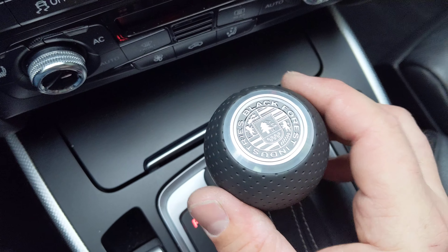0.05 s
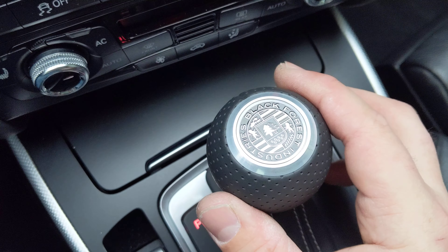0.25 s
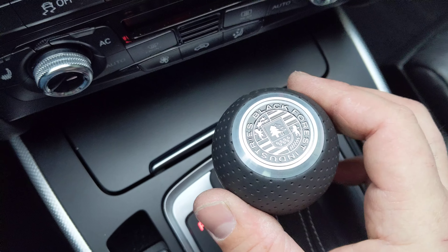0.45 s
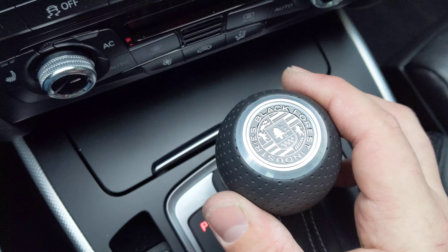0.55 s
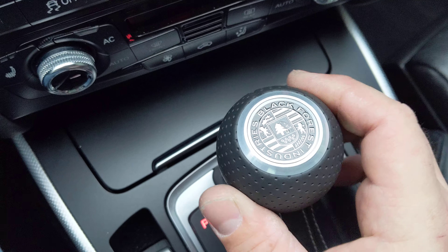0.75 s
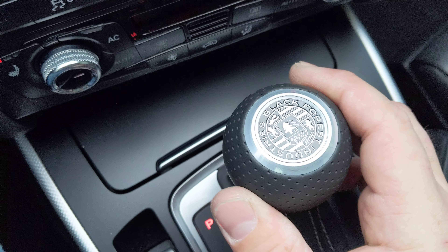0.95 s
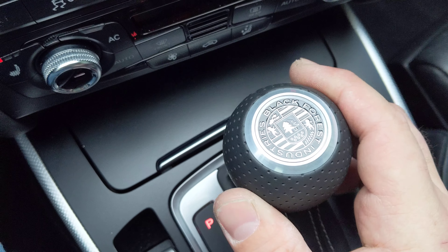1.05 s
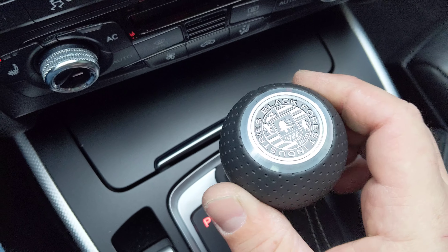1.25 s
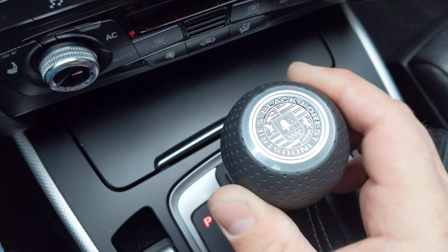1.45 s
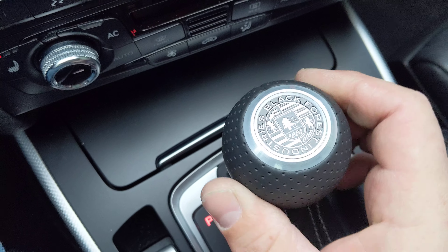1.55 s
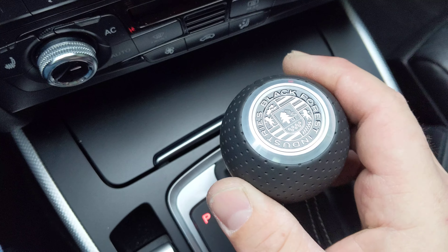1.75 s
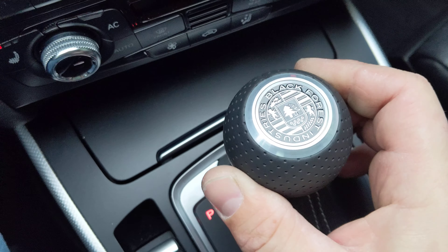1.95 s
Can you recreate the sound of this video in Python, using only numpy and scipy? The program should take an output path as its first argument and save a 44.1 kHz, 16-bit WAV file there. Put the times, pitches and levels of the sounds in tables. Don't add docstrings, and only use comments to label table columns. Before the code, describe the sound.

A loose gear knob rattles with quick dull clicks as a hand rocks it over idling-engine hum.

```python
import sys
import numpy as np
from scipy import signal
from scipy.io import wavfile
from scipy.ndimage import uniform_filter1d

SR = 44100
rng = np.random.default_rng(int(sys.argv[2]) if len(sys.argv) > 2 else 0)


def generate_wav(signal):
    frames = np.transpose(np.atleast_2d(signal))
    scaled = np.clip(frames, -1, 1) * 32767
    pcm = np.round(scaled).astype(np.int16)
    wavfile.write(sys.argv[1], SR, pcm)


def undo_db(level):
    steps = np.asarray(level, float) / 20
    return 10 ** steps


N = 88905

# time in seconds, firing rate in Hz, level in dB.
SPEED = [(0, 23.2, -39.5), (0.279, 23.33, -44), (.62, 23.21, -40.5), (.96, 23.53, -40), (1.301, 23.21, -41),
         (1.64, 23.27, -43), (2.02, 22.35, -42.5)]
# multiple of the firing rate, level in dB.
ORDERS = [(1, 1), (2, -12), (3, -21), (4, -29.5), (5, -23), (6, -23)]
# frequency in Hz, level in dB.
RUMBLE = [(8, 2.5), (30, -2), (50, -1.5), (80, -11.5), (125, -6.5), (170, -15.5), (260, -10.5),
          (420, -18.5)]
# frequency in Hz, level in dB.
WASH = [(180, -58), (300, -9), (593, -4), (841, -18), (1010, -16), (2000, -21.5), (5600, -21), (12900, -27),
        (16000, -28)]
# frequency in Hz, width in Hz, level in dB.
DUCT = [(983, 180, -75), (1500, 120, -91.5), (5670, 200, -87.5), (7490, 510, -86)]
# frequency in Hz, likeness from 0 to 1.
LIKENESS = [(60, 1), (150, 1), (380, 0.33), (950, 0.54), (2380, 0.12), (5980, 0.022), (15000, 0.024)]
# frequency in Hz, left over right in dB.
BALANCE = [(60, 4), (180, 0.5), (550, 3), (1650, 2.5), (4970, -1), (15000, -1.5)]
# time in seconds, level in dB, phase between left and right in radians.
WHINE = [(0, -78, 1.5), (0.852, -77, 1.9), (1.03, -77, 2.4), (1.101, -86, 2.7), (1.3, -87, 2.9),
         (1.45, -77, 3.2), (1.9, -86, 3.1), (2.02, -77, 2.5)]
# time in seconds, level in dB, frequency in Hz.
BOOMS = [(0.023, -55.5, 249), (.243, -46.5, 265), (0.5, -48.5, 267.5), (.657, -67, 256), (.70, -59, 254),
         (0.801, -55, 217), (.909, -46, 258), (1.088, -49, 255.6), (1.286, -50, 238), (1.436, -54, 257),
         (1.467, -48, 264), (1.638, -43.5, 246), (1.664, -51, 246), (1.82, -51.5, 274), (1.846, -59.5, 257),
         (2.01, -45, 250)]
# time in seconds, level in dB, frequency in Hz.
FAVOURED = [(.022, -58, 387), (.022, -64.5, 952), (.022, -74, 5350), (.245, -58.5, 386), (.245, -60, 938),
            (.4195, -71.5, 1545), (.4195, -70, 2530), (.4195, -65, 11370), (.4195, -71, 9300),
            (.496, -48, 374.7), (.497, -51, 950), (.499, -54.5, 3430), (.657, -64, 624), (.688, -59.5, 413),
            (.688, -57, 608), (.688, -66, 2580), (.714, -62, 442), (.716, -72, 1430), (.882, -68, 1325),
            (.909, -48.5, 437), (.909, -54, 958), (1.088, -60, 592), (1.088, -57.5, 870),
            (1.088, -72, 2340), (1.111, -57.5, 419), (1.11, -61, 1380), (1.283, -48, 446),
            (1.283, -55.5, 936), (1.283, -55, 1314), (1.435, -60, 462), (1.435, -63.5, 629),
            (1.433, -57, 1040), (1.433, -61.5, 1280), (.689, -63, 855), (1.283, -64, 5460),
            (1.638, -62, 5500), (0.911, -62, 5550), (1.436, -61.5, 2650), (1.467, -63, 855),
            (1.467, -70, 5350), (1.467, -65, 9420), (1.491, -59, 403), (1.49, -62, 1400), (1.637, -45, 462),
            (1.638, -59, 930), (1.638, -58.5, 1230), (1.819, -55, 393), (1.819, -59, 924),
            (1.822, -60, 2500), (1.846, -57.5, 365), (2.008, -50.5, 454), (2.008, -54.5, 960)]
# start in seconds, then the levels in dB of the shell,
# the console thump, the stem clack and the cap tick.
HARD_KNOCKS = [
    (0.883, -58.5, -72, -72, -78),
    (0.909, -44, -43.5, -58.5, -51),
    (1.207, -62.5, -86, -73, -84),
    (1.283, -41.5, -42.5, -56.5, -45.5),
    (1.638, -40, -40, -55, -47.5),
    (2.01, -41.5, -41, -54, -43.5),
]
# start in seconds, shell, console, stem and cap levels in dB.
SOFT_KNOCKS = [(0.209, -66, -56, -74, -77), (0.221, -56.5, -56, -75, -82), (0.245, -54, -48, -75, -83),
               (0.419, -66, -60.5, -78, -78), (0.497, -49, -45, -60.5, -66), (0.658, -58, -56.5, -72, -79),
               (0.688, -50, -50, -62.5, -68.5), (0.714, -72, -62, -71, -74), (1.063, -60, -73, -73.5, -76),
               (1.088, -51, -48, -62.5, -75), (1.436, -45, -51, -65.5, -76),
               (1.819, -46.5, -51.5, -64.5, -73), (1.846, -54.5, -55, -69.5, -73)]
# start in seconds, shell, console, collar and cap levels in dB.
REBOUNDS = [(0.022, -50.5, -62, -63, -66.5), (1.11, -66.5, -55, -65.5, -71), (1.466, -53, -52, -65, -65.5),
            (1.489, -60, -65, -64.5, -68)]
# frequency in Hz, level in dB, t60 in seconds.
CONSOLE_HARD = [(386, 0, 0.04), (515.5, -0.5, 0.041), (599, -3.5, 0.027), (722, -6.5, 0.0274)]
# frequency in Hz, level in dB, t60 in seconds.
CONSOLE_SOFT = [(306, 1, 0.041), (386.8, 2, 0.033), (436, -1, 0.031), (622.6, -8, 0.027)]
# frequency in Hz, level in dB, t60 in seconds.
SHELL = [(608, 0.5, 0.0071), (702, -4.5, 0.015), (874, -9.5, 0.023), (941, -1, 0.019),
         (1058.6, -8.5, 0.032), (1256, -3, 0.016), (1477, -9.5, 0.019), (1750, -10, 0.0062)]
# frequency in Hz, level in dB, t60 in seconds.
STEM_HARD = [(2060, 2, 0.0063), (2270, -2, 0.01), (2720, -1.5, 0.0096), (3220, 5, 0.005),
             (3940, 4.5, 0.005), (4180, -30, 0.0056), (5550, 1, 0.0045), (5740, -0.5, 0.01)]
# frequency in Hz, level in dB, t60 in seconds.
STEM_SOFT = [(1710, 0, 0.0063), (2433, 2, 0.0067), (2800, 0, 0.005), (3400, -3.5, 0.0018),
             (3730, 0, 0.0065), (4140, -0.5, 0.0057), (5110, -3.5, 0.0035), (5060, -13, 0.0043)]
# frequency in Hz, level in dB, t60 in seconds.
COLLAR = [(2300, 0, 0.006), (3410, 3.5, 0.0034), (4620, -5.5, 0.0067), (5140, 0.5, 0.007),
          (5750, -21, 0.0012), (4050, -14, 0.0041)]
# frequency in Hz, level in dB, t60 in seconds.
CAP = [(6000, 5, 0.002), (7390, 1.5, 0.0063), (7940, -3, 0.0076), (9250, 1.5, 0.0047), (9530, -11, 0.0055),
       (11360, -3.5, 0.0033), (12500, -4.5, 0.0017), (13900, -12, 0.0016)]
# delay in seconds, chatter length in seconds, rise in cycles,
# detune as a share, level offset in dB.
STRIKE = [
    (0.0053, 0.0019, 3.2, 0.028, -6),
    (-.002, 0.0087, 1.3, 0.045, -9),
    (0.0006, 0.00023, 3, 0.043, 3.5),
    (0.0012, 0.00086, 2.6, 0.012, -2),
]
# delay in seconds, chatter length in seconds,
# rise in cycles, detune as a share.
STRIKE_HARD = [
    (.0005, .0008, 4, .002),
    (-.001, .001, 3, .002),
]
# level in dB, t60 in seconds, left-right likeness from 0 to 1,
# left over right in dB.
CABIN = [
    (-4.5, 0.16, 0.37, 3.5),
    (-3.5, 0.098, 1, 5.5),
    (4, 0.08, 0.067, 3.5),
    (1, 0.071, 0.095, 3),
]

RIGHT_LATE = 5


def evened(x):
    return x / np.sqrt(np.mean(x ** 2) + 1e-20)


def read(points, hz):
    f, value = np.transpose(points)
    return np.interp(np.log(hz + 1), np.log(f + 1), value)


def panned(db):
    return undo_db(np.array([[db / 2], [-db / 2]]))


def drift(top_hz):
    t = np.arange(N) / SR
    rates = top_hz * np.geomspace(.05, 1, 16)
    return evened(sum(np.sin(2 * np.pi * (f * t + rng.random())) / np.sqrt(f) for f in rates))


def firing():
    first_firing_s = 0.0027
    t = np.arange(N) / SR
    s, hz, db = np.transpose(SPEED)
    turns = np.cumsum(np.interp(t, s, hz)) / SR
    return turns - hz[0] * first_firing_s, np.interp(t, s, db)


def engine():
    waver_db, waver_rad, lag_rad = 2, 0.23, 0.67
    turns, db = firing()
    hum = np.zeros(N)
    for order, order_db in ORDERS:
        level = undo_db(db + order_db + waver_db * np.sqrt(order) * drift(9.03))
        phase = (order - 1) * (waver_rad * drift(7.02) - lag_rad)
        hum -= level * np.cos(2 * np.pi * order * turns + phase)
    return np.sqrt(2) * hum * panned(0.5)


def noise(shape):
    patch_db = 1.2
    frames, hz = N // 256 + 5, np.fft.rfftfreq(1024, 1 / SR)
    a, b, c, d, patches = rng.standard_normal((frames, 513, 5)).T
    patches = uniform_filter1d(patches, size=10, axis=0)
    patches = evened(uniform_filter1d(patches, size=8, axis=1))
    alike = read(LIKENESS, hz)[:, None]
    left, other = a + 1j * b, c + 1j * d
    z = np.array([left, alike * left + np.sqrt(1 - alike ** 2) * other])
    balance = undo_db(np.multiply.outer([.5, -.5], read(BALANCE, hz)))[:, :, None]
    z *= shape(hz)[:, None] * undo_db(patch_db * patches) * balance
    return evened(signal.istft(z, nperseg=1024, noverlap=768)[1][:, :N])


def air():
    rumble_db, wash_db, throb_db = -53, -67.5, 1.5
    rumble = noise(lambda f: undo_db(read(RUMBLE + [(900, -60), (20000, -120)], f)))
    wash = noise(lambda f: undo_db(read([(100, -50)] + WASH, f)))
    duct = np.zeros((2, N))
    for hz, width, db in DUCT:
        duct += undo_db(db) * noise(lambda f: 1 / (1 + (2 * (f - hz) / width) ** 2))
    throb = undo_db(throb_db * np.cos(2 * np.pi * (firing()[0] - .25)))
    return undo_db(rumble_db) * rumble + undo_db(wash_db) * wash + throb * duct


def whine():
    whine_hz, pan_db = 15625, 8
    t = np.arange(N) / SR
    s, db, apart = np.transpose(WHINE)
    side = np.array([[.5], [-.5]])
    level = undo_db(np.interp(t, s, db) + side * pan_db)
    return np.sqrt(2) * level * np.sin(2 * np.pi * whine_hz * t - side * np.interp(t, s, apart))


def booms():
    peak_s, pair_ratio, pair_db, pan_db = .0085, 1.2, -9, 2
    out, t = np.zeros(N + 7000), np.arange(4000) / SR
    swell = (t / peak_s) ** 2 * np.exp(2 - 2 * t / peak_s)
    for s, db, hz in BOOMS:
        at = round(s * SR)
        pair = np.sin(2 * np.pi * hz * t) + undo_db(pair_db) * np.sin(2 * np.pi * hz * pair_ratio * t)
        out[at:at + 4000] += undo_db(db) * np.sqrt(2) * swell * pair
    return out[:N] * panned(pan_db)


def favoured():
    peak_at_1khz_s, slope, pan_db = 0.0034, 0.46, 5.5
    out, t = np.zeros(N + 7000), np.arange(3000) / SR
    for s, db, hz in FAVOURED:
        at = round(s * SR)
        u = t / (peak_at_1khz_s * (1000 / hz) ** slope)
        out[at:at + 3000] += undo_db(db) * np.sqrt(2) * u * np.exp(1 - u) * np.sin(2 * np.pi * hz * t)
    return np.array([out, np.roll(out, RIGHT_LATE)])[:, :N] * panned(pan_db)


def cracks():
    decay_s, pan_db = .003, 3
    out, t = np.zeros((2, N + 7000)), np.arange(1200) / SR
    for s, _, _, stem_db, cap_db in HARD_KNOCKS + SOFT_KNOCKS + REBOUNDS:
        at = round((s + .001) * SR)
        for band_hz, db in (((1510, 6700), stem_db - 0.5), ((9600, 15000), cap_db - 13)):
            a, b = rng.standard_normal((2, 1200))
            band = signal.butter(2, band_hz, "band", fs=SR, output="sos")
            burst = signal.sosfilt(band, np.array([a, .6 * a + 1.1 * b]))
            out[:, at:at + 1200] += undo_db(db) * evened(burst) * np.exp(-t / decay_s)
    return out[:, :N] * panned(pan_db)


def ring(modes, chatter_s, rise, detune, wet_db, wet_s, alike):
    contacts_per_s, spread_db = 900, 3.5
    t = np.arange(6000) / SR
    hits = (rng.random(6000) < contacts_per_s / SR) * undo_db(spread_db * rng.standard_normal(6000) + 2.5)
    hits[0] = 1
    hits = hits * np.exp(-t / chatter_s)
    a, b = rng.standard_normal((2, 6000)) * (rng.random((2, 6000)) < .3) * undo_db(-60 * t / wet_s) * (t > .001)
    scatter = np.array([a, alike * a + np.sqrt(1 - alike ** 2) * b])
    drive = hits / np.linalg.norm(hits) + undo_db(wet_db) * scatter / np.linalg.norm(a)
    hz, db, t60 = np.transpose(modes)[:, :, None]
    angle = 2 * np.pi * hz * (1 + detune * rng.standard_normal(hz.shape)) * t
    onset = 1 - np.exp(-t * hz / rise)
    body = (undo_db(db - 60 * t / t60) * np.sin(angle) * onset).sum(0)
    out = signal.fftconvolve(drive, body[None], axes=1)[:, :6000]
    return out / np.sqrt(uniform_filter1d((out ** 2).mean(0), size=300).max())


def knob():
    out = np.zeros((2, N + 7000))
    hard_rings = [ring(modes, *strike[1:4], *room[:3])
                  for modes, strike, room in zip((CONSOLE_HARD, SHELL), STRIKE_HARD, CABIN)]
    kinds = ((HARD_KNOCKS, (CONSOLE_HARD, SHELL, STEM_HARD, CAP)),
             (SOFT_KNOCKS, (CONSOLE_SOFT, SHELL, STEM_SOFT, CAP)),
             (REBOUNDS, (CONSOLE_SOFT, SHELL, COLLAR, CAP)))
    for knocks, parts in kinds:
        for s, shell_db, console_db, stem_db, cap_db in knocks:
            levels = (console_db, shell_db, stem_db, cap_db)
            for k, (db, modes, strike, room) in enumerate(zip(levels, parts, STRIKE, CABIN)):
                if knocks is HARD_KNOCKS and k < len(STRIKE_HARD):
                    delay_s, sound = STRIKE_HARD[k][0], hard_rings[k]
                else:
                    delay_s, sound = strike[0], ring(modes, *strike[1:4], *room[:3])
                at = round((s + delay_s) * SR)
                out[:, at:at + 6000] += undo_db(db + strike[4]) * panned(room[3]) * sound
    return np.array([out[0], np.roll(out[1], RIGHT_LATE)])[:, :N]


def scene():
    return engine() + air() + whine() + booms() + favoured() + cracks() + knob()


def roll_off(x):
    return signal.sosfilt(signal.butter(12, 16110, fs=SR, output="sos"), x)


def record(dry):
    lowpass = signal.firwin(1023, 15790, window=("kaiser", 9), fs=SR)
    mix = signal.oaconvolve(dry, lowpass[None], "same")
    return roll_off(mix)


dry = scene()
out = record(dry)
generate_wav(out)
```